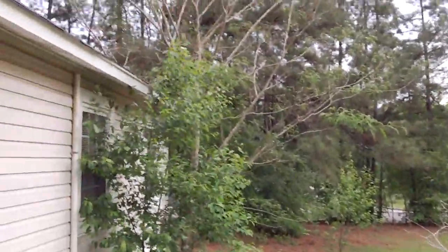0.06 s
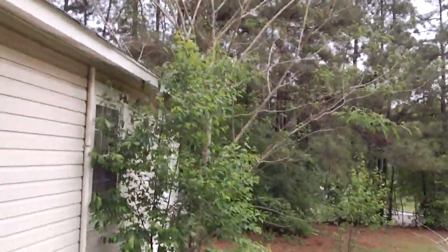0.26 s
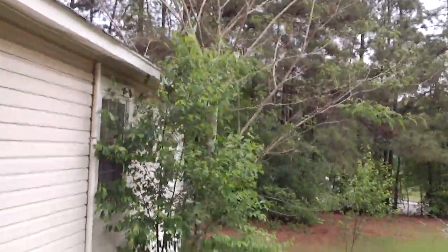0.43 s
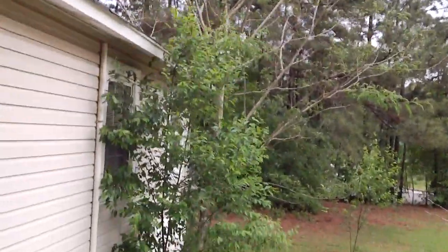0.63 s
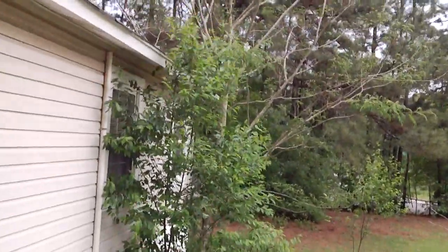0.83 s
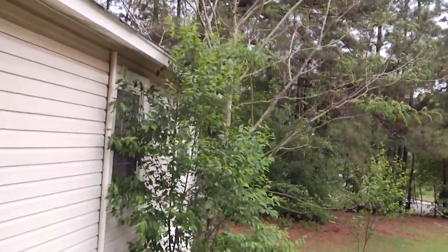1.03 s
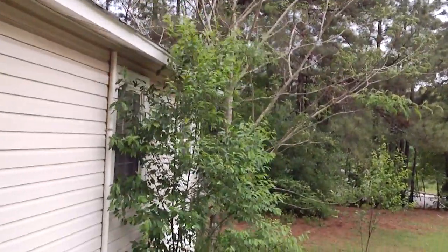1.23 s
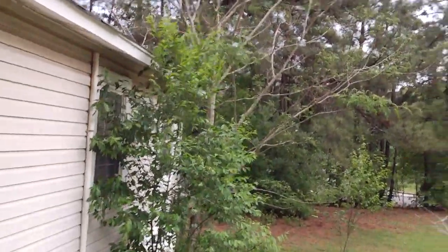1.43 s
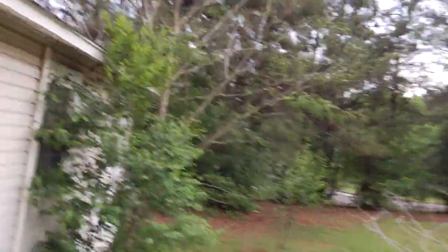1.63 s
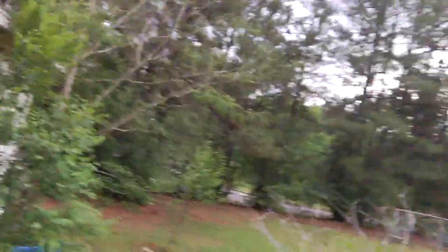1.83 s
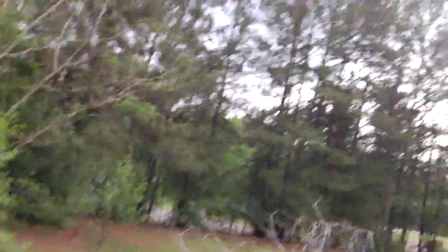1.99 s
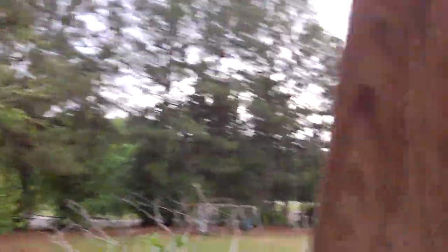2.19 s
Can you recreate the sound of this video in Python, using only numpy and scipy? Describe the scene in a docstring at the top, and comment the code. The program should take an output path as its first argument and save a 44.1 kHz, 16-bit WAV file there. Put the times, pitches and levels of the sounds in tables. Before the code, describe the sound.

Outdoor wind hits the microphone in rumbling gusts, thumping hardest in the first half and weakening afterward. Behind it runs an even rush of trees and fluttering leaves, with a few twigs ticking lightly later on.

```python
"""A low, gusty rumble with hard thumps sounds over a steady rush of wind in the pines.
The rumble is air swirling at the microphone, and each thump is one strong swirl hitting it.
The rush is air passing through countless needles. Nearer leaves flutter against each other,
and later a few twigs tick. A faint, very high electrical whine runs underneath."""
import sys
import numpy as np
from scipy import signal
from scipy.fft import rfft, irfft, next_fast_len
from scipy.io import wavfile
from scipy.ndimage import uniform_filter1d

SR = 44100
rng = np.random.default_rng(int(sys.argv[2]) if len(sys.argv) > 2 else 0)


def master(y):
    """Save y as 16-bit WAV."""
    cut = np.clip(np.atleast_2d(y).T, -1, 1)
    pcm = np.round(cut * 32767)  # scale
    wavfile.write(sys.argv[1], SR, pcm.astype(np.int16))


N = 103635


def undb(db):
    """Turn decibels into a volume factor."""
    return 10 ** (np.asarray(db) / 20)


def unit(x):
    """Scale to an average power of 1."""
    return x / np.sqrt(np.mean(x ** 2))


def curve(rows):
    """Join (time [s], value) rows by straight lines."""
    return np.interp(np.arange(N) / SR, *np.array(rows).T)


def colour(x, points):
    """Shape the tone by (frequency [Hz], level [dB]) points."""
    size = next_fast_len(N)
    hz, db = np.array(points).T
    f = np.maximum(np.arange(size // 2 + 1) * SR / size, 1)
    gain = undb(np.interp(np.log(f), np.log(hz), db))
    return irfft(rfft(x, size) * gain, size)[:N]


def noise(points):
    """Noise of power 1 with the given tone."""
    return unit(colour(rng.standard_normal(N), points))


def walk(rate):
    """A smooth random drift that changes about rate times a second."""
    held = rng.standard_normal(512)[(np.arange(N) * rate / SR).astype(int) % 512]
    k = int(SR / rate)
    return unit(uniform_filter1d(uniform_filter1d(held, k), k))


def pines(level_db=-37.5, swell=0.34, flicker_db=0.65, hiss_growth=0.16):
    """Air rushes through the needles: more wind makes it louder and a little brighter."""
    # tone of the treetops: (frequency [Hz], relative level [dB])
    spectrum = [(30, -20), (120, 1), (190, 1), (270, 5.5), (400, 0), (520, 0.5), (750, -0.5), (1000, -2.5),
                (1400, -2.5), (2000, -11), (2800, -17.5), (3150, -22.5), (3600, -21), (4800, -23.5),
                (5800, -23), (8000, -31), (11500, -38.5), (15500, -37.5)]
    # wind in the treetops, 0 is normal: (time [s], strength [no unit])
    breeze = [(0, -1.5), (.4, -0.5), (.8, -0.5), (1.2, 0.48), (1.55, 0.56), (2.0, 0), (2.35, 0)]
    rush = rfft(noise(spectrum))
    wind = curve(breeze) + swell * walk(1.6)
    hz = np.maximum(np.arange(len(rush)) * SR / N, 1)
    octave = np.clip(np.log2(hz / 125), 0, 7)
    out = 0
    for k in range(8):  # octave bands swell together but flicker alone
        band = irfft(rush * np.maximum(1 - abs(octave - k), 0), N)
        swell_db = wind * (1.5 + hiss_growth * (k > 3))
        out = out + band * undb(swell_db + flicker_db * walk(15.9))
    return out * undb(level_db)


def leaves(level_db=-57, touches_per_s=3500, decay_s=0.0027):
    """Nearby leaves brush each other, and each touch is a tiny burst of noise."""
    # tone of the leaves: (frequency [Hz], relative level [dB])
    spectrum = [(1500, -11), (3100, 1.5), (3800, 5), (4800, 0), (5900, 2), (8000, -11.5), (10000, -16),
                (15000, -24)]
    # the gust reaching the leaves: (time [s], relative level [dB])
    rustle = [(0, -6), (.45, -1.5), (.85, 0.3), (1.4, 0.2), (1.8, -1.8), (2.35, 0)]
    touches = rng.random(N) < touches_per_s / SR
    strength = undb(1.7 * np.minimum(rng.exponential(size=N), 5))
    flutter = signal.lfilter([1], [1, -np.exp(-1 / (decay_s * SR))], touches * strength)
    bursts = flutter * rng.standard_normal(N)
    return unit(colour(bursts, spectrum)) * undb(level_db + curve(rustle))


def rumble(large_db=1.5, small_db=-13.5, steady_s=0.056):
    """Large and small swirls of air rumble at the microphone, following the gusts."""
    # gusts: (time [s], relative level [dB])
    gusts = [(0, -32.5), (.08, -32), (.14, -26), (.25, -26), (.33, -30.5), (.39, -23), (.49, -26),
             (.58, -25.5), (.64, -26.5), (.68, -22.5), (.73, -22.5), (.79, -34), (.85, -23), (.92, -22.5),
             (.99, -32), (1.08, -28), (1.22, -36), (1.32, -30.5), (1.43, -35.5), (1.52, -27.5), (1.68, -30),
             (1.77, -34), (1.9, -37), (2.0, -37.5), (2.08, -29), (2.15, -35), (2.35, -31)]
    # tone of the large swirls: (frequency [Hz], relative level [dB])
    large_spectrum = [(8, -52), (18, 6), (65, -4), (100, -8), (150, -15.5), (220, -31), (400, -50),
                      (900, -71)]
    # tone of the small swirls: (frequency [Hz], relative level [dB])
    small_spectrum = [(50, -10.5), (110, -2), (165, -6.5), (260, -8), (380, -43), (800, -58)]
    large, small = noise(large_spectrum), noise(small_spectrum)
    span = int(steady_s * SR)
    power = uniform_filter1d(uniform_filter1d(large ** 2, span), span)
    large = large / np.sqrt(power)  # even out chance swells
    return (large * undb(large_db) + small * undb(small_db)) * undb(curve(gusts))


def whine(level_db=-68, pitch_hz=15734, pulse_hz=13.4, pulse_depth=0.28):
    """A thin electrical tone pulses quickly."""
    t = np.arange(N) / SR
    pulse = 1 + pulse_depth * np.sin(2 * np.pi * pulse_hz * t)
    return undb(level_db) * pulse * np.sqrt(2) * np.sin(2 * np.pi * pitch_hz * t)


def thumps(wobble_radians=0.29, flap_ratio=1.96):
    """A strong swirl's low-pressure core sucks at the microphone between two shoves."""
    # swirls: (time [s], peak level [dB], half-length [s], pitch [Hz], relative flapping level [dB])
    swirls = [(.381, -14, 0.014, 90.5, -18), (0.459, -9, 0.011, 52, -23), (0.492, -4.5, 0.0096, 50, -15),
              (0.506, -10.5, 0.0049, 173, -12.5), (0.513, -3.5, 0.00584, 52, -11),
              (0.52, -13.5, 0.067, 22, -32), (0.568, -8, .015, 41, -34), (0.615, -7, 0.0071, 78, -21),
              (.664, -10, 0.0047, 110, -17.5), (0.68, -10, 0.011, 17, -23), (.688, -18, 0.012, 127, -6.5),
              (0.712, -11.5, 0.014, 62, -6), (0.834, -18.5, 0.015, 33, -15),
              (0.918, -4, 0.0076, 52.6, -12.5), (0.913, -14.5, 0.0086, 150.6, -12.5),
              (1.321, -21, .02, 38, -30), (1.516, -15, .011, 86.5, -10.5), (1.646, -22, 0.017, 56, -17),
              (1.717, -20.5, 0.013, 44, -6), (2.049, -24, 0.01, 67, -32)]
    t, out = np.arange(N) / SR, 0
    wobble = wobble_radians * walk(140)
    for (at, db, half_length, hz, flap_db), turn in zip(swirls, rng.random(len(swirls))):
        angle = 2 * np.pi * hz * (t - at) + wobble
        flap = undb(flap_db) * np.cos(flap_ratio * angle + 2 * np.pi * turn)  # faster shake inside
        envelope = undb(db) * np.exp(-((t - at) / half_length) ** 2)
        out = out + envelope * (flap - np.cos(angle))
    return out


def twigs():
    """Each twig gives a dry tick that rings around its own pitch and dies at once."""
    # ticks: (time [s], level [dB], fade time [s], pitch [Hz])
    ticks = [(1.189, -48, 0.0027, 8500), (1.873, -36.5, 0.0051, 3430), (1.879, -42, 0.0053, 2740),
             (1.934, -48, 0.0073, 5870)]
    # tone of a twig: (frequency [multiple of its pitch], relative level [dB])
    spectrum = [(.25, -9), (.7, -3), (1, -4), (1.3, -15), (2, -22), (4, -40)]
    t, out = np.arange(N) / SR, 0
    for at, db, decay, hz in ticks:
        ring = noise([(hz * multiple, gain_db) for multiple, gain_db in spectrum])
        out = out + ring * undb(db) * (t >= at) * np.exp(-abs(t - at) / decay)
    return out


def scene():
    """Add all the sounds into one channel."""
    return (pines() + leaves() + rumble() + whine() + thumps() + twigs())[None]


def record(dry, top_hz=16000):
    """A steep filter cuts off the highest treble."""
    return signal.sosfilt(signal.ellip(10, .1, 80, top_hz, fs=SR, output="sos"), dry)


dry = scene()
out = record(dry)
master(out)
```